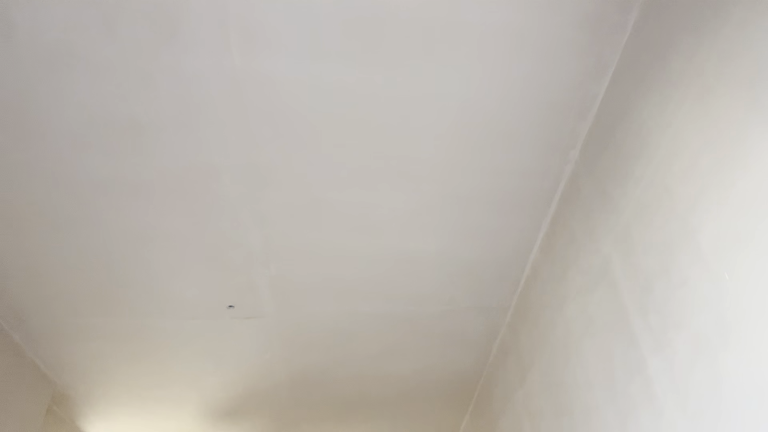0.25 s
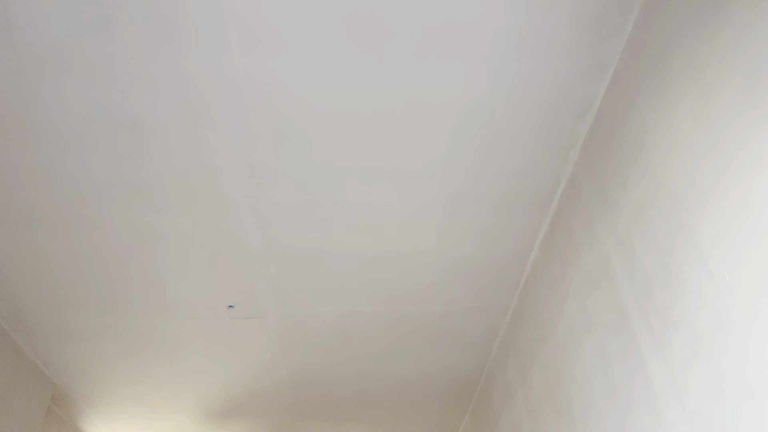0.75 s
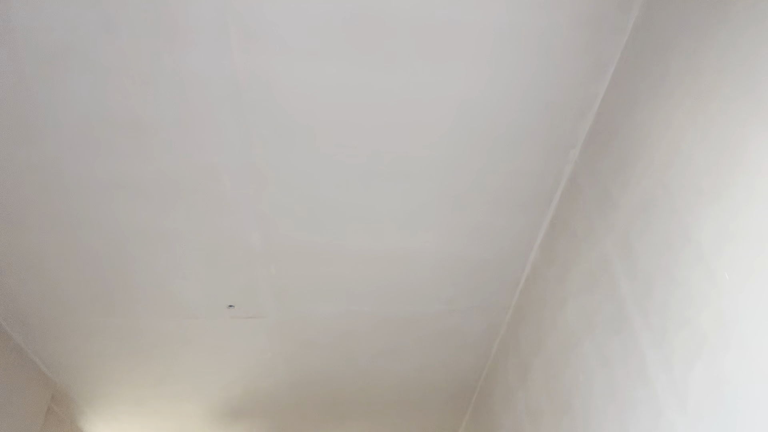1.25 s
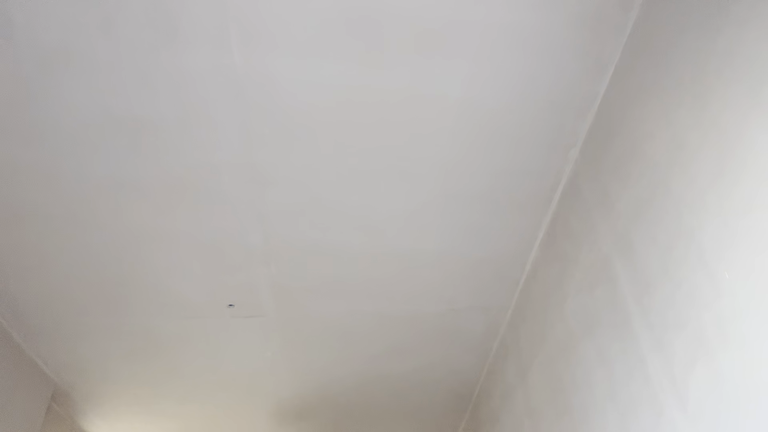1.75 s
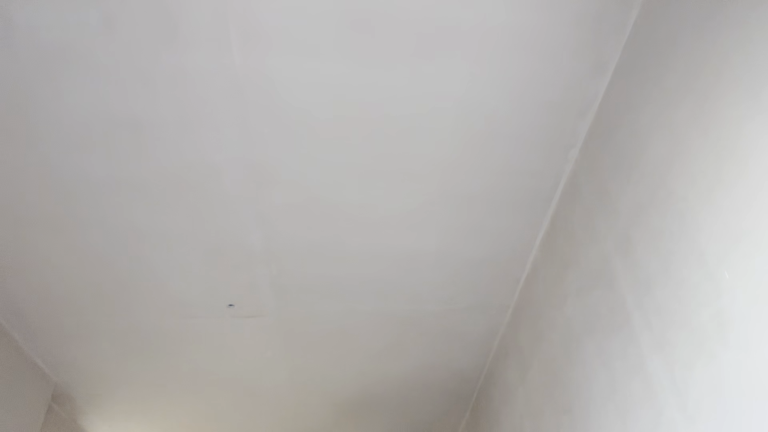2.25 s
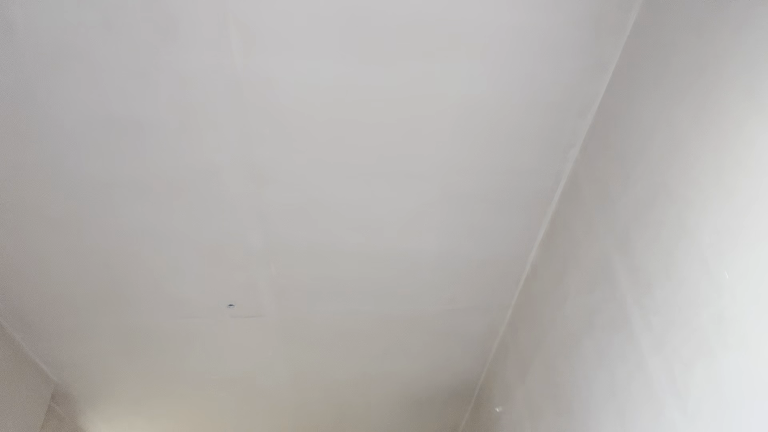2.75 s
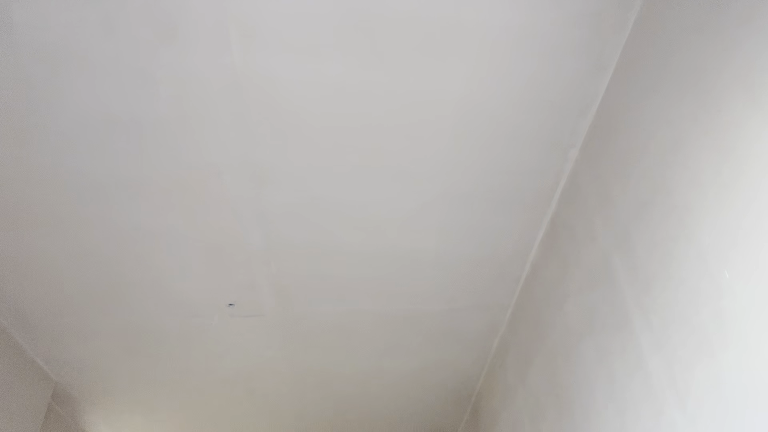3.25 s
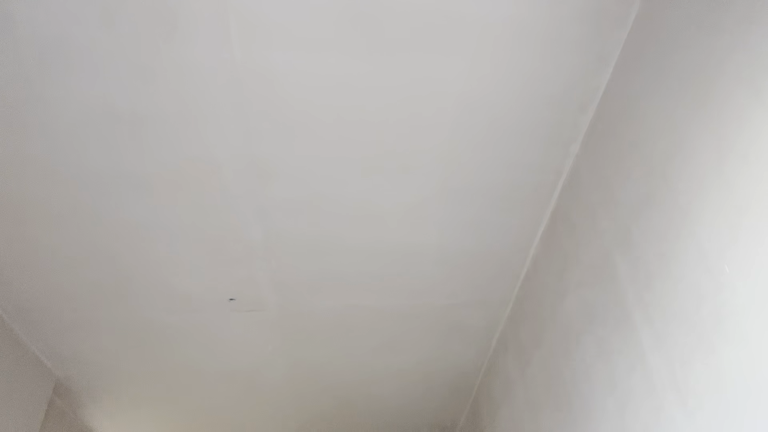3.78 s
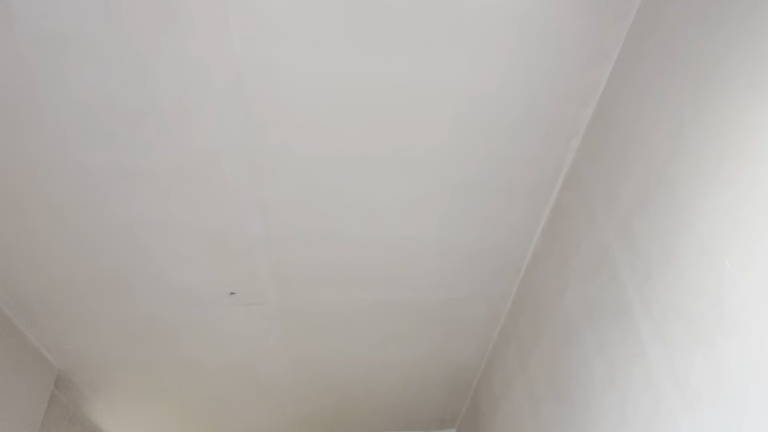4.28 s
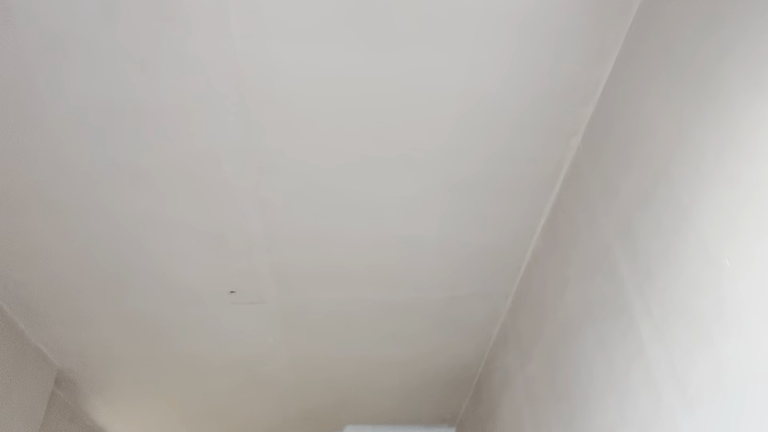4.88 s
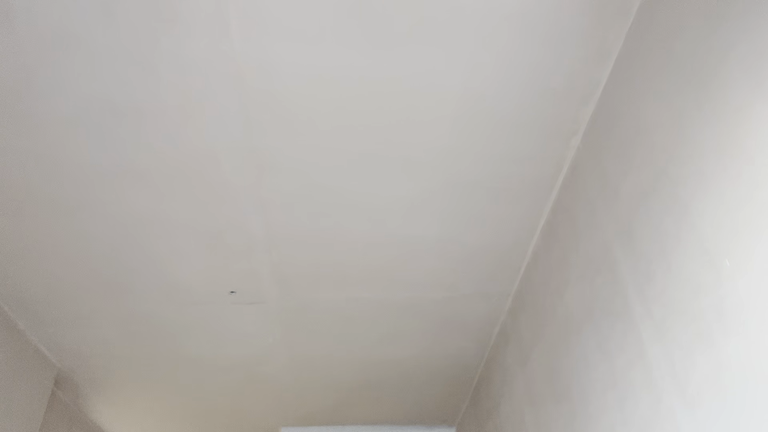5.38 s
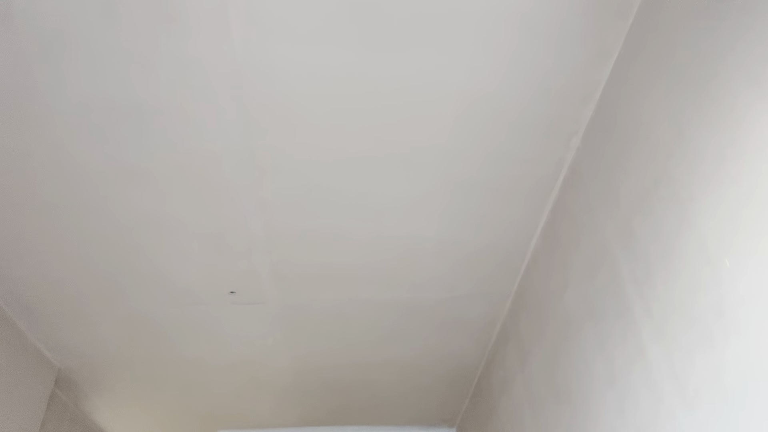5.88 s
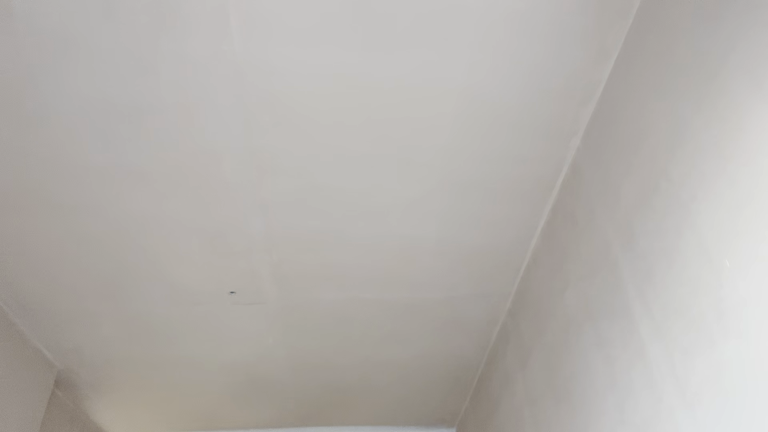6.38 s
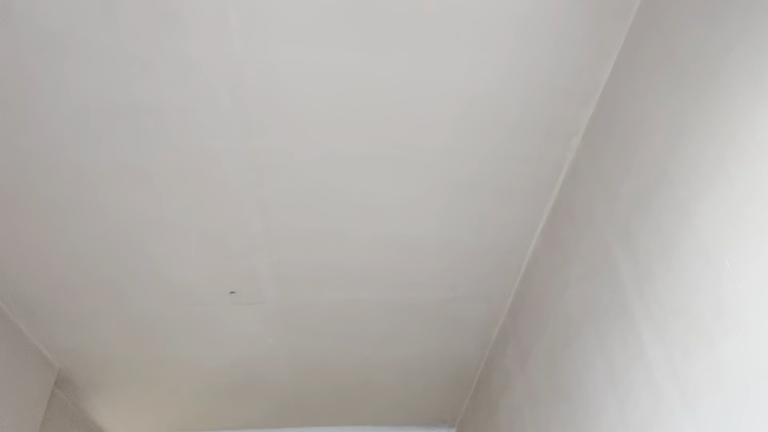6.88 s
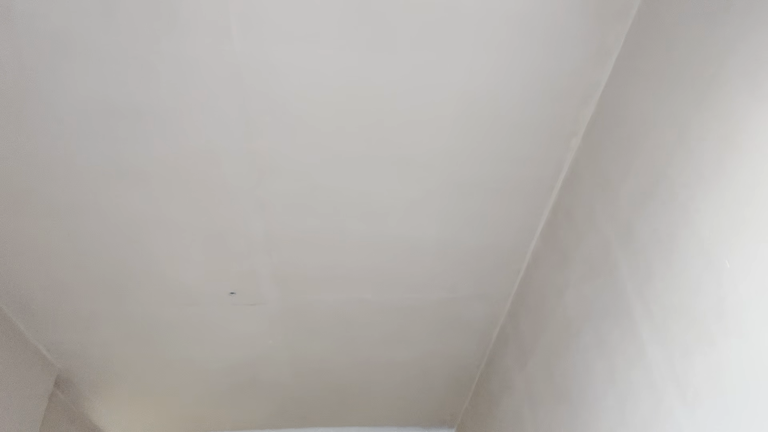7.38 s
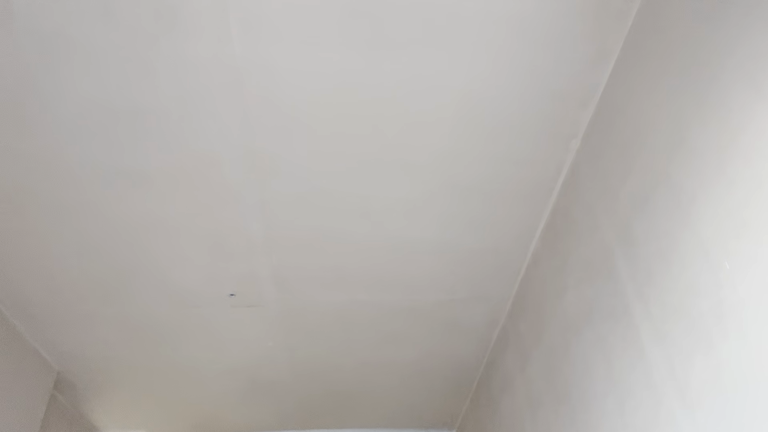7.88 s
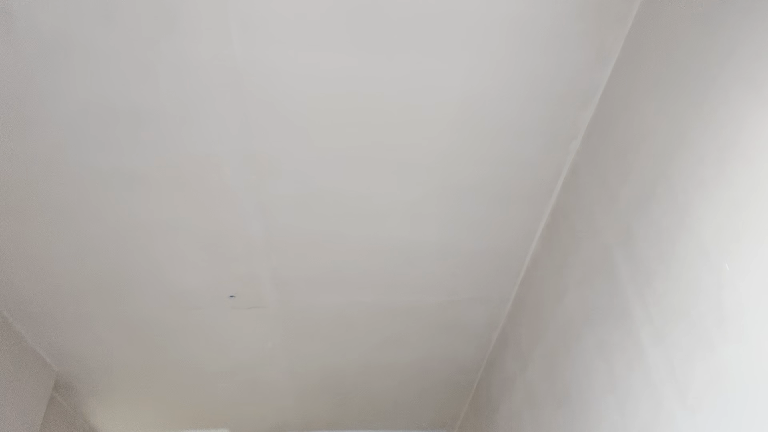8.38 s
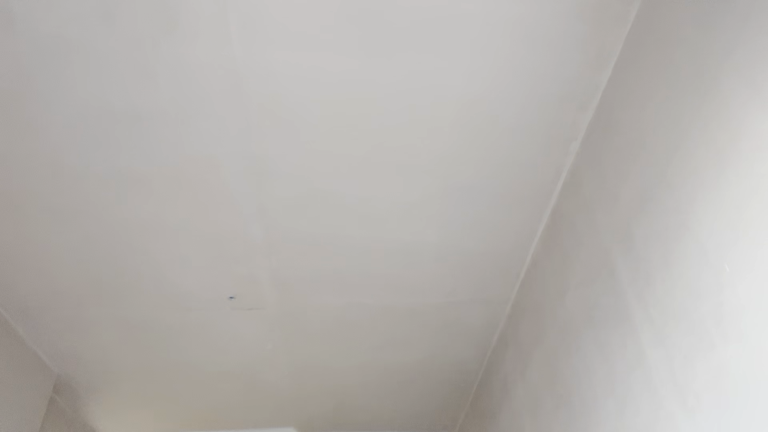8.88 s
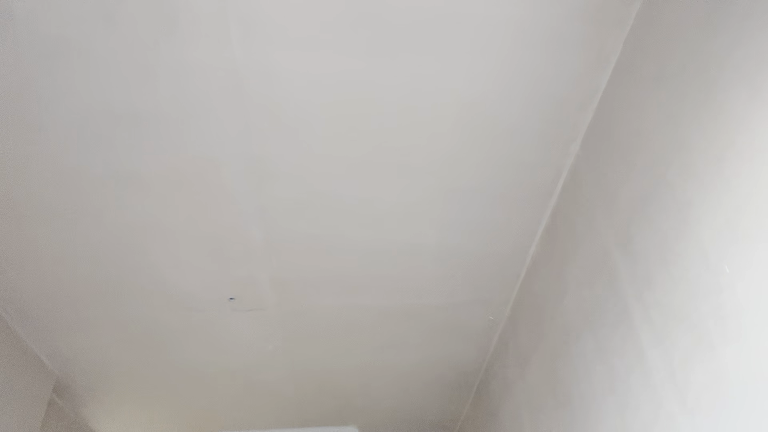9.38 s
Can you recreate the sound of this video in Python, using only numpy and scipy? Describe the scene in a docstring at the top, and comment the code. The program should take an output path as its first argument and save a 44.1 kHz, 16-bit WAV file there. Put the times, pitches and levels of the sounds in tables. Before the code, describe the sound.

A loud, steady high-pressure paint sprayer hiss fills a bare room, dipping briefly three times, with soft low air rumble and one dull late knock.

```python
"""A steady paint-spray hiss fills a bare, unfinished room, close to a two-port microphone.
The jet is noise shaped in frequency; its level sags each time the piston pump turns over.
The walls return a duller hiss, noise nearly unrelated at the two ports, with narrow standing waves.
Air pushed by the spray buffets the microphone as lumpy low noise; near the end the pump motor hums faintly
in wandering tones, and one dull knock rings and rumbles."""
import sys
import numpy as np
from scipy import signal
from scipy.fft import rfft, irfft
from scipy.io import wavfile
from scipy.ndimage import uniform_filter1d

SR = 44100
rng = np.random.default_rng(int(sys.argv[2]) if len(sys.argv) > 2 else 0)


def how_loud(loudness_db):
    """Turn decibels into a plain amplitude multiplier (0 dB gives 1, 20 dB gives 10)."""
    steps = np.asarray(loudness_db, float) / 20
    return 10 ** steps


def file_out(sig):
    """Save sig as 16-bit WAV at sys.argv[1]."""
    # one column per channel
    cols = np.atleast_2d(sig).T
    # limit, then scale
    lim = np.clip(cols, -1, 1)
    pcm = np.round(lim * 32767).astype(np.int16)
    wavfile.write(sys.argv[1], SR, pcm)


N = 425124  # samples

# short-time spectra: window and step in samples, then bin frequencies in Hz and frame times in s
SIZE, HOP = 1024, 256
FRAMES = N // HOP + 6
HZ, T = np.fft.rfftfreq(SIZE, 1 / SR), np.arange(FRAMES) * HOP / SR
SAMPLE_T = np.arange(N) / SR
FULL_HZ = np.fft.rfftfreq(N, 1 / SR)  # bins of a spectrum of the whole scene
PORTS = np.array([[.5], [-.5]])  # shares a left-right difference between left and right


def evened(x):
    """Normalization: scales to rms 1."""
    return x / np.sqrt(np.mean(abs(x) ** 2) + 1e-20)


def read(points, hz):
    """Interpolation along a logarithmic frequency axis, closer to pitch than a linear one."""
    f, value = np.transpose(points)
    return np.interp(np.log(hz + 1), np.log(f + 1), value)


def column(rows, t, count):
    """Linear interpolation in time of one column of a curve."""
    columns = np.transpose(rows)
    return np.interp(t, columns[0], columns[count])


def cells():
    """Gaussian noise: an independent complex value in each bin and frame."""
    real, imaginary = rng.standard_normal((FRAMES, len(HZ), 2)).T
    return real + 1j * imaginary


def patches():
    """Interference: echoes add and cancel anew as the gun moves, in streaks about 130 Hz by 120 ms."""
    field = rng.standard_normal((FRAMES, len(HZ))).T
    across_bins = uniform_filter1d(field, size=3, axis=0)
    return evened(uniform_filter1d(across_bins, size=20, axis=1))


def wander(t, low_hz, top_hz):
    """Random modulation: sines of random phase, the slower ones stronger, sum to rms 1."""
    rates_hz = low_hz * (top_hz / low_hz) ** np.linspace(0, 1, num=30)
    return evened(sum(np.sin(2 * np.pi * (f * t + rng.random())) / np.sqrt(f) for f in rates_hz))


def sound(z):
    """Overlap-add synthesis: turns short-time spectra into samples of rms 1."""
    samples = signal.istft(z, nperseg=SIZE, noverlap=SIZE - HOP)[1]
    return evened(samples[..., :N])


# the piston turns over and pressure sags: lowest_s, depth_db
PUMP_STROKES = [(1.182, -10), (4.356, -13.5), (7.565, -10.5)]
BLEED_DB_PER_S, BITE_S = 170, 0.019


def pressure_db(t):
    """Pump pressure bleeds at a steady rate, then recovers exponentially as the piston bites again."""
    sag_db = 0
    for lowest_s, depth_db in PUMP_STROKES:
        bleed_db = np.minimum(depth_db + BLEED_DB_PER_S * (lowest_s - t), 0)
        recovery_db = depth_db * np.exp(-abs(t - lowest_s) / BITE_S)
        sag_db = sag_db + np.where(t < lowest_s, bleed_db, recovery_db)
    return sag_db


# the gun moves along the ceiling: time_s, spray_level_db, low_roar_level_db, boxy_ring_level_db
GUN_PATH = [(0, 3, 1.5, -0.5), (.7, 1, -3, -1.5), (1.1, .5, 3, -1), (2.3, 2, -5.5, 0), (2.7, 1.5, -1, .5),
            (3.5, 1.5, -1, 1), (4, 1, 3.5, -0.5), (5, 1, -5, 0), (6.2, .5, 1.5, -1), (7, -.5, -2, -0.5),
            (7.4, -1, 3.5, 0.5), (7.8, -0.25, 0, -3), (8.6, .5, 1.5, 2.5), (9, .5, 5, 2), (9.64, 1, 3, 2)]
# paint tearing into mist at the tip: frequency_hz, relative_density_db
JET_SPECTRUM = [(2500, -32), (4000, -17), (5500, -8.5), (6700, -1), (7400, 0), (8500, 0), (9900, -2.5),
                (11000, -1.5), (11800, -.5), (12600, -2), (13700, 0), (14400, -3.5), (16000, -2.5)]
# the jet reaches the left port first: frequency_hz, left_lead_radians
JET_LEAD = [(4000, 1.5), (6000, 1.7), (8000, 1.95), (9400, 2.45), (11100, 3.1), (12400, 3.6), (15700, 5.3)]
JET_DB, JET_FLICKER_DB, JET_PATCHES_DB = -18.5, 0.34, 1.1  # level, then rms of the two fluctuations


def jet():
    """Turbulent jet noise: one hiss at both ports a moment apart, all its bands flickering together."""
    flicker_db = JET_FLICKER_DB * wander(T, 2.7, 60)
    colour_db = read(JET_SPECTRUM, HZ)[:, None] + flicker_db + JET_PATCHES_DB * patches()
    z = cells() * how_loud(colour_db)
    half_lead = np.exp(.5j * read(JET_LEAD, HZ))[:, None]
    hiss = sound(np.array([z * half_lead, z / half_lead]))
    return hiss * how_loud(JET_DB + column(GUN_PATH, SAMPLE_T, count=1) + pressure_db(SAMPLE_T))


# hiss that the walls return: frequency_hz, relative_density_db
WALL_SPECTRUM = [(100, -49), (300, -16), (500, -10.5), (850, -5.5), (1100, -7), (1350, -4), (1700, -7),
                 (2400, -10), (3200, -3), (5000, -2.5), (6700, 2.5), (9000, -7.5), (12000, -17),
                 (16000, -3)]
# likeness of the ports in the wall hiss: frequency_hz, correlation (-1 to 1)
WALL_CORRELATION = [(100, 0.36), (250, 0.52), (400, 0.22), (700, -0.36), (1200, -0.14), (1550, -0.65),
                    (1900, 0.18), (2900, 0.26), (3300, -0.16), (4400, 0.046), (6000, -0.082)]
# narrow standing waves of the bare room: frequency_hz, width_hz, level_db
ROOM_MODES = [(707, 43, 4), (822, 18, 5.5), (877, 18, 2.5), (1190, 11, 2), (1323, 28, 0.5), (1330, 20, 4.5),
              (1410, 27, -5), (1510, 40, 2.5), (2085, 53, 5)]
WALLS_DB, WALLS_PATCHES_DB = -25, 1.5
WALLS_FOLLOW = 0.88  # share of the spray's level change heard from the walls
ROAR_HZ, ROAR_FLUTTER_DB = 600, 2.5  # the roar lies below this frequency
BOX_HZ, BOX_WIDTH_HZ = 774, 890
WALLS_SAG, SAG_HZ = 0.57, 2400  # share of the pump's sag left in the echoes, above this frequency


def walls():
    """Diffuse reverberant field: nearly unrelated at the ports; echoes fill each sag, the low ones wholly."""
    same, left = np.clip(read(WALL_CORRELATION, HZ), -1, 1)[:, None], cells()
    right = same * left + np.sqrt(1 - same ** 2) * cells()
    low = 1 / (1 + (HZ / ROAR_HZ) ** 4)
    box = 1 / (1 + (2 * (HZ - BOX_HZ) / BOX_WIDTH_HZ) ** 2)
    high = 1 / (1 + (SAG_HZ / (HZ + 1)) ** 4)
    roar_db = column(GUN_PATH, T, count=2) + ROAR_FLUTTER_DB * wander(T, 2.5, 16)
    colour_db = np.outer(low, roar_db)
    colour_db += np.outer(box, column(GUN_PATH, T, count=3))
    colour_db += np.outer(high, WALLS_SAG * pressure_db(T))
    colour_db += read(WALL_SPECTRUM, HZ)[:, None] + WALLS_PATCHES_DB * patches()
    hiss = sound(np.array([left, right]) * how_loud(colour_db))
    modes_db = sum(db / (1 + (2 * (FULL_HZ - f) / width) ** 2) for f, width, db in ROOM_MODES)
    hiss = irfft(rfft(hiss) * how_loud(modes_db), N)
    return hiss * how_loud(WALLS_DB + WALLS_FOLLOW * column(GUN_PATH, SAMPLE_T, count=1))


# moving air on the microphone: time_s, deep_level_db, flutter_level_db
AIR_LEVELS = [(0, -45.5, -47.5), (.7, -52.5, -53.5), (1, -51, -50.5), (1.15, -43, -45), (1.45, -43, -49.5),
              (2.0, -44.5, -47.5), (2.35, -43, -46.5), (2.64, -40.5, -36.5), (2.95, -47, -44),
              (3.6, -43.5, -41.5), (4.3, -37.5, -43), (4.77, -37, -40.5), (4.9, -43, -44.5),
              (5.26, -55, -42), (5.44, -36, -43.5), (5.7, -56, -42.5), (6.3, -39.5, -48), (7.4, -45, -47),
              (7.9, -57, -55), (9.3, -68, -53)]
# colour of the moving air: frequency_hz, relative_density_db
AIR_SPECTRUM = [(12, -50), (20, -53), (46, 0), (70, 0.5), (114, -4.5), (258, -14.5), (329, -19), (387, -22),
                (500, -25.5), (650, -59), (1100, -120)]
# part unlike at the ports: time_s, level_relative_to_alike_part_db
AIR_UNLIKE = [(0, -6), (.4, -4), (1, -5), (9.3, -16)]
AIR_SPLIT_HZ, AIR_LUMPS_DB = 100, 1.46  # deep part below, flutter above; rms of the lumps


def buffet():
    """Wind noise: lumpy low pressure fluctuation, deep and fluttering, mostly alike at both ports."""
    spectrum = rfft(rng.standard_normal((2, N))) * how_loud(read(AIR_SPECTRUM, FULL_HZ))
    deep_share = 1 / (1 + (FULL_HZ / AIR_SPLIT_HZ) ** 4)
    deep = evened(irfft(spectrum * np.sqrt(deep_share), N))
    flutter = evened(irfft(spectrum * np.sqrt(1 - deep_share), N))
    deep_gain = how_loud(column(AIR_LEVELS, SAMPLE_T, count=1))
    flutter_gain = how_loud(column(AIR_LEVELS, SAMPLE_T, count=2))
    alike, unlike = deep * deep_gain + flutter * flutter_gain  # two independent noises
    unlike = unlike * how_loud(column(AIR_UNLIKE, SAMPLE_T, count=1))
    lumps = how_loud(AIR_LUMPS_DB * wander(SAMPLE_T, 4, 40))
    return np.array([alike + unlike, alike - unlike]) * lumps


# one dull knock: ring_hz, level_db, t60_s, left_minus_right_db, left_lead_radians
KNOCK_RINGS = [(258, -26, 0.15, 6, -.5), (148, -34, 1.7, 8, -0.8), (96, -27, 0.5, 0, -.4),
               (74.3, -32, 1.2, -1, -.2), (361, -44, 0.69, 6, -.2)]
KNOCK_S, KNOCK_RISE_CYCLES = 9.341, 0.93  # each ring builds within its first cycle
SHUDDER_DB, SHUDDER_REST_DB = -35, -43
SHUDDER_RISE_S, SHUDDER_HOLD_S, SHUDDER_T60_S = 0.058, 0.07, .5


def knock():
    """Damped modal vibration: low rings start together, and a rumble swells, holds and settles."""
    t = np.maximum(SAMPLE_T - KNOCK_S, 0)
    rings = np.zeros((2, N))
    for hz, db, t60, lean_db, lead in KNOCK_RINGS:
        decay = how_loud(db + PORTS * lean_db - 60 * t / t60)
        rise = np.minimum(t * hz / KNOCK_RISE_CYCLES, 1)
        rings += decay * rise * np.sin(2 * np.pi * hz * t + PORTS * lead)
    band = signal.butter(2, [75, 178], "bandpass", fs=SR, output="sos")
    rumble = evened(signal.sosfilt(band, rng.standard_normal(N)))
    fade_db = -60 * np.maximum(t - SHUDDER_RISE_S - SHUDDER_HOLD_S, 0) / SHUDDER_T60_S
    level = np.maximum(how_loud(SHUDDER_DB + fade_db), how_loud(SHUDDER_REST_DB))
    return rings + rumble * level * np.minimum(t / SHUDDER_RISE_S, 1)


# motor and pump frame: pitch_hz, level_db, left_minus_right_db, left_lead_radians
MOTOR_TONES = [(74, -53.5, 0, -.2), (98, -54, 0, -.2), (148, -52, 3, -.7), (220, -52.5, 4, -.8),
               (319, -52.5, 9, -1)]
# common swell of the tones: time_s, relative_level_db
MOTOR_SWELL = [(0, -30), (7.6, -20), (8.3, -5), (8.7, -6), (9.2, 1), (9.64, -3)]
MOTOR_WIDTH_HZ = .4  # spectral width that the wandering phase gives each tone


def hum():
    """Phase diffusion broadens each tone; room echoes give it its own level and phase per port."""
    out = np.zeros((2, N))
    for hz, db, lean_db, lead in MOTOR_TONES:
        drift = np.cumsum(rng.standard_normal(N)) * np.sqrt(2 * np.pi * MOTOR_WIDTH_HZ / SR)
        tone = np.sqrt(2) * np.sin(2 * np.pi * hz * SAMPLE_T + drift + PORTS * lead)
        out += how_loud(db + PORTS * lean_db) * tone
    return out * how_loud(column(MOTOR_SWELL, SAMPLE_T, count=1))


# the mono edge creeps up from MONO_START_S towards its top, then slides back from MONO_FALL_S
MONO_TOP_HZ, MONO_START_S, MONO_CREEP_S = 287, 0.28, 0.9
MONO_FALL_S, MONO_SLIDE_HZ_PER_S = 8.24, 240
MONO_WAVER = 0.095  # rms share by which the edge wavers


def mono_bass(x):
    """Mid-side filtering: removes the left-right difference below a moving edge."""
    mid, side = (x[0] + x[1]) / 2, (x[0] - x[1]) / 2
    hz, t, z = signal.stft(side, SR, nperseg=4096, noverlap=3072)
    creep_hz = MONO_TOP_HZ * (1 - np.exp(-np.maximum(t - MONO_START_S, 0) / MONO_CREEP_S))
    slide_hz = MONO_SLIDE_HZ_PER_S * np.maximum(t - MONO_FALL_S, 0)
    edge_hz = np.maximum(creep_hz - slide_hz, 0)
    edge_hz *= 1 + MONO_WAVER * wander(t, 0.478, 8)
    keep = 1 / (1 + (edge_hz / (hz[:, None] + 1)) ** 12)
    side = signal.istft(z * keep, SR, nperseg=4096, noverlap=3072)[1][:N]
    return np.array([mid + side, mid - side])


def scene():
    """Superposition: the pressures of all sources add at the two ports."""
    return jet() + walls() + buffet() + hum() + knock()


# the ports differ in colour: frequency_hz, left_minus_right_db
PORT_COLOUR = [(200, 0), (350, 1), (800, 0), (1300, 3.5), (2400, 3), (3300, 2), (5000, -.5), (7000, 3),
               (9000, 1.5), (9800, 0)]
EDGE_HZ = 15730  # nothing passes above


def top_cut(x):
    """Nothing passes above the cut-off."""
    return signal.sosfilt(signal.butter(12, 17090, fs=SR, output="sos"), x)


def record(dry):
    """Linear filtering: the ports differ in colour, the band is limited and the bass narrows to mono."""
    colour = how_loud(PORTS * read(PORT_COLOUR, FULL_HZ))
    limited = irfft(rfft(dry) * colour * (FULL_HZ < EDGE_HZ), N)
    mix = mono_bass(limited)
    return top_cut(mix)


dry = scene()
out = record(dry)
file_out(out)
```